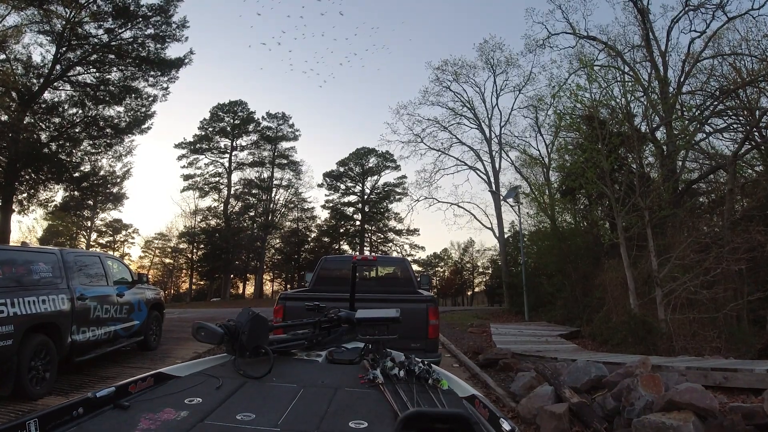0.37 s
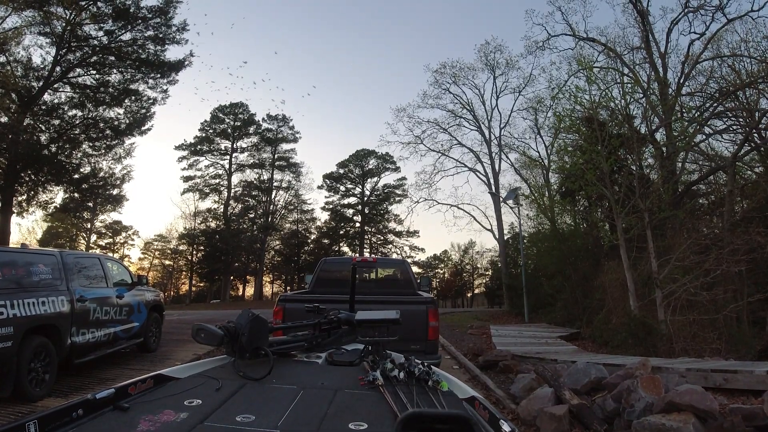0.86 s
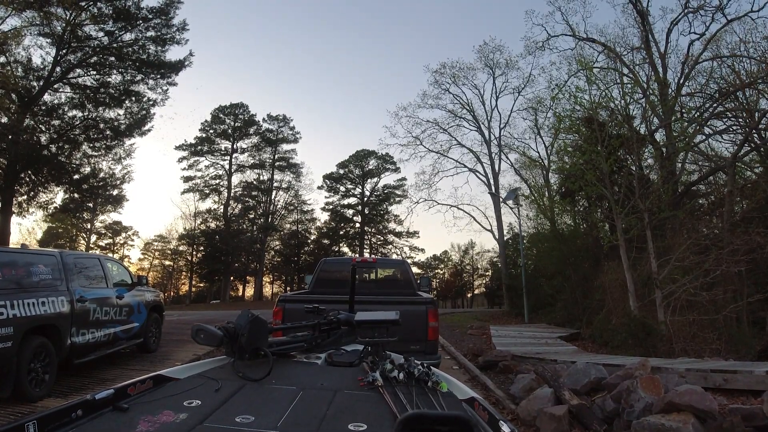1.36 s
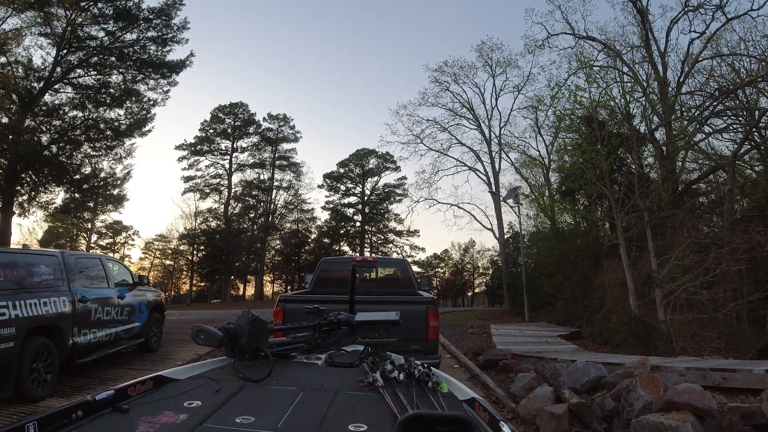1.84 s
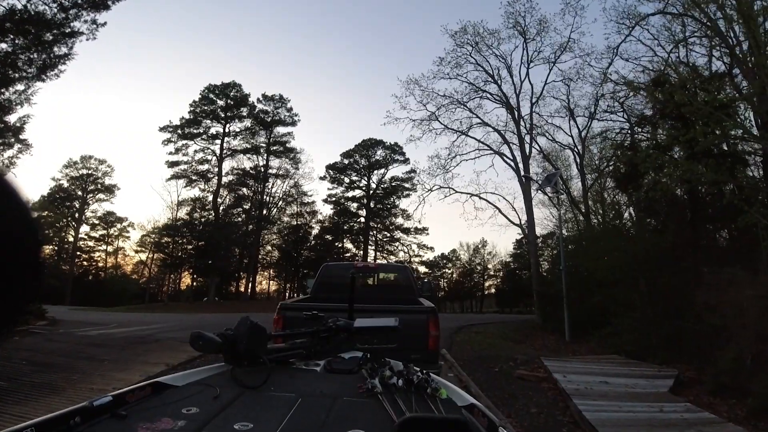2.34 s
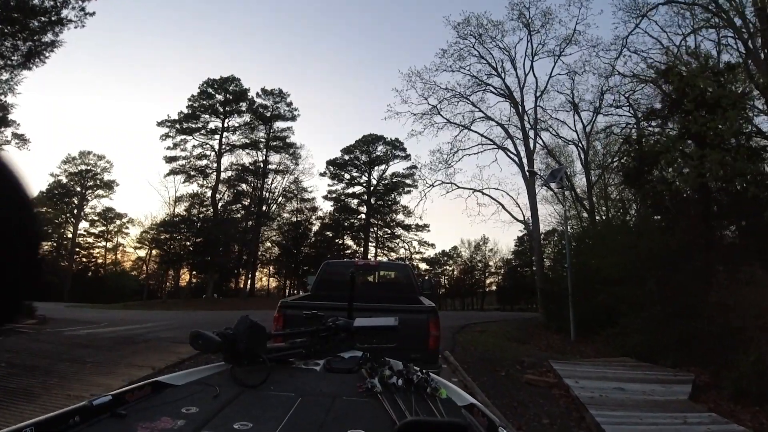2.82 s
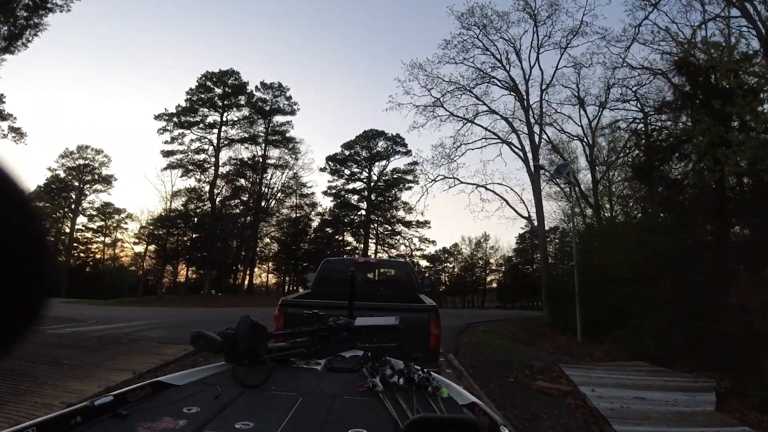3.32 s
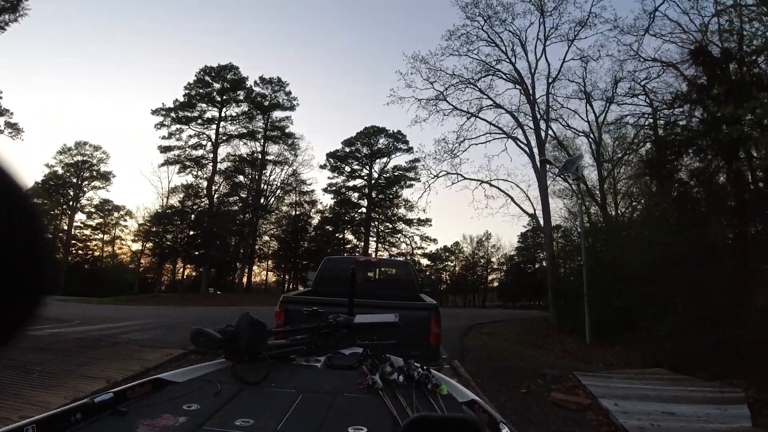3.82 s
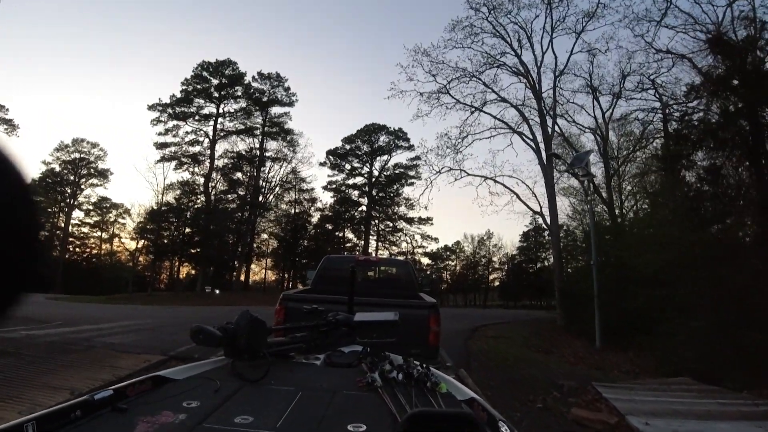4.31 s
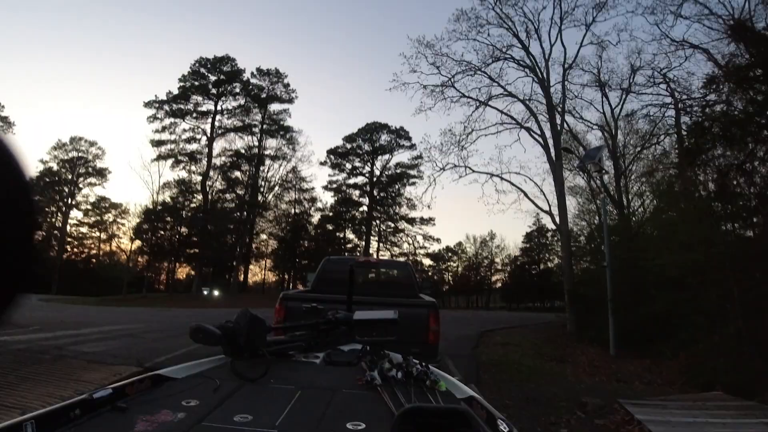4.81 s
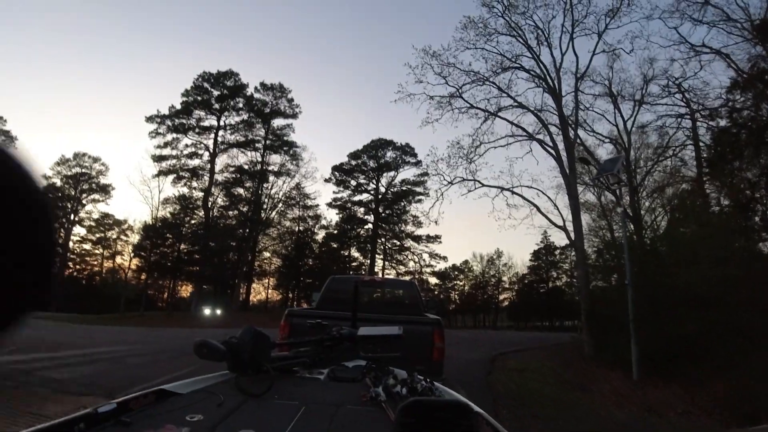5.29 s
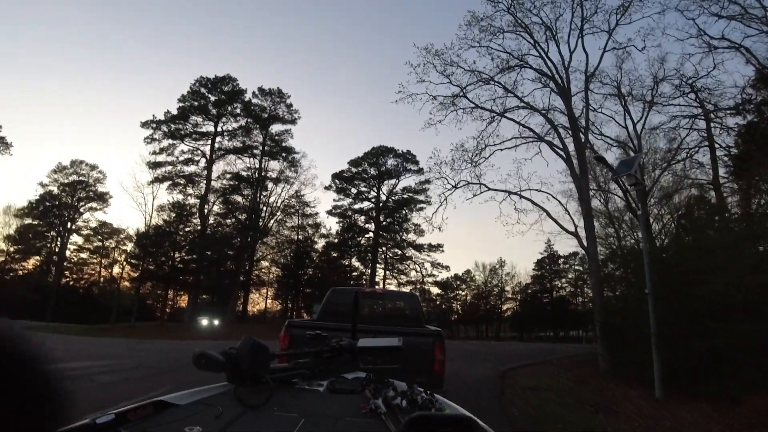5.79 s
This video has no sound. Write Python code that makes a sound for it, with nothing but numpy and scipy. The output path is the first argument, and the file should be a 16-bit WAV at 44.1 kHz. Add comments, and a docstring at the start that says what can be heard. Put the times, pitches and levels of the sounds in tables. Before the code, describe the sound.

A nearby engine revs up with a raspy growl and is let off, then a pickup drones down the road with wind and trailer rattle.

```python
"""On a boat on a trailer, a microphone hears the pickup that tows it.
First a near engine revs and rasps, built from loping tones and puffed noise, and is let off.
After a quiet moment and a hard cut, the pickup drones along: firing tones from unequal cylinders.
Coloured noise makes the road roar, the wind on the microphone and a fading high hiss.
Short rings and cracks make the trailer rattle over a bump; low pulses make the buffets."""
import sys
import numpy as np
from scipy import signal
from scipy.io import wavfile
from scipy.ndimage import uniform_filter1d

SR = 44100
rng = np.random.default_rng(int(sys.argv[2]) if len(sys.argv) > 2 else 0)


def transcribe(u):
    """Save the signal u as a 16-bit wav file named by the first command-line argument.

    u: samples, shape (n,) or (channels, n), limited to [-1, 1]; the rate is SR.
    q: integer samples, one column per channel.
    """
    v = np.clip(np.atleast_2d(u).T, -1, 1)
    q = np.round(v * 32767).astype(np.int16)
    wavfile.write(sys.argv[1], SR, q)


def invert_db(x):
    """Field ratio 10**(x/20) for x, a level in decibels (scalar or array-like)."""
    u = np.asarray(x, float) / 20
    return 10 ** u


N = 260631
TIME = np.arange(N) / SR
BINS = np.fft.rfftfreq(1024, 1 / SR)  # the pitches, in Hz, at which noise is coloured

# Colour of the yard's background noise: [f/Hz, relative level/dB]
YARD_COLOUR = [(15, -45), (25, 5), (140, 0.5), (173, -6.5), (313, -25.5), (399, -11), (945, -27),
               (2300, -30), (5140, -51.5), (8580, -52), (15500, -47.5)]
# Likeness of left and right in the yard and on the road: [f/Hz, likeness from -1 to 1]
YARD_LIKENESS = [(60, 0.93), (240, 1.0), (950, 0.96), (3770, 0.79), (15000, 0.15)]
ROAD_LIKENESS = [(60, 0.07), (240, 0.86), (950, 0.99), (2000, 0.78), (3770, 0.45), (8000, -0.41),
                 (15000, 0.3)]
# Colour of the noise on the road: [f/Hz, relative level/dB]
ROAD_COLOUR = [(140, -26), (230, -6.5), (508, -25), (736, -11), (1410, -28), (2910, -30.5), (4850, -39.5),
               (7940, -42), (8670, -59.5), (9140, -77), (9980, -90), (15500, -60)]
# Resonances of body and bed in the road noise: [f/Hz, width/Hz, boost/dB]
BODY_RESONANCES = [(705, 55, 5.5), (968.5, 52, 12.5), (1139, 99, 8.5), (560, 67, 3), (2210, 300, 3.5),
                   (2901, 61, 4.5), (3400, 85, 1.5), (3840, 72, 4.5)]
# Colour of the lumpy wind on the microphone: [f/Hz, relative level/dB]
WIND_COLOUR = [(10, -27.5), (30, 5.5), (70, 8.5), (160, 1.0), (260, -11.5), (480, -11.5), (700, -60)]
# Narrow bands of high hiss: [f/Hz, width/Hz, wobble level/dB, fading/(dB/s)]
HIGH_HISS = [(8450, 710, -62, 13), (9500, 300, -85, 7.5)]
# One thin high squeak: [start t/s, rise/s, length/s, wobble level/dB, fading/(dB/s), f/Hz]
SQUEAK_SHAPE = 4.36, .025, .35, -70, 75, 10050
# Faint drivetrain whines: [f/Hz, width/Hz, wobble level/dB]
DRIVETRAIN_WHINES = [(722, 14, -57), (955, 14, -61), (1100, 14, -63), (2920, 30, -66)]
# Low buffets: [t/s, level/dB, f/Hz]
BUFFETS = [(2.76, -28.5, 70), (4.189, -21.5, 60), (4.492, -22, 70), (4.844, -17, 82), (5.109, -19.5, 74.5)]
# Knocks of the trailer fittings: [t/s, level/dB, ring f/Hz]
TRAILER_KNOCKS = [(1.495, -37.5, 2310), (1.496, -36.5, 1570), (1.497, -40, 1020), (1.921, -55, 4070),
                  (2.84, -39, 1820), (4.7556, -34, 2200), (4.7805, -34, 1650), (4.804, -28, 1580),
                  (4.8915, -27.5, 2420), (4.892, -36, 4100), (4.9357, -28.5, 1530), (5.0185, -42, 2070),
                  (5.0285, -28, 1900), (5.0644, -32.5, 1910), (5.0886, -38, 1710), (5.1286, -34.5, 4040),
                  (5.1452, -36, 3900), (5.1492, -30.5, 1890), (5.1861, -40, 1850), (5.2238, -33, 1770),
                  (5.4168, -41, 1920), (5.744, -38, 1670)]
# Partials in the ring of one fitting: [ratio to the ring f, level/dB, time to fall 60 dB/s]
FITTING_PARTIALS = [(1, 0, .035), (.68, -8, .025)]
# The pickup on the road: [t/s, firing f/Hz, octave level/dB]
DRONE_COURSE = [(2, 93.14, -23.5), (2.4, 93.27, -24.5), (2.85, 93, -22), (3.3, 93.73, -24),
                (3.9, 92.4, -24), (4.5, 93.03, -25.5), (4.85, 92.64, -32.5), (5.5, 89.9, -32),
                (5.85, 89.9, -33.5)]
# Side tones from eight unequal cylinders: [multiple of the cycle (firing / 8), level over the octave/dB]
CYLINDER_TONES = [(5, -13), (10, -28), (12, -28), (13, -20), (15, -27), (19, -28), (21, -27), (24, -23),
                  (28, -31), (30, -31), (31, -30), (32, -32), (40, -36), (46, -38), (53, -36), (62, -35),
                  (64, -37)]
# A soft falling hum in the quiet moment: [t/s, firing f/Hz, firing level/dB, octave level/dB]
COAST_COURSE = [(1.48, 100.3, -70, -63.5), (1.58, 99.1, -67, -45), (1.72, 90.7, -51, -42),
                (1.82, 85.83, -41, -37.5), (1.96, 86.8, -59, -48)]
# The revving engine: [t/s, cycle f/Hz, firing tone level/dB]
REV_COURSE = [(0, 24.62, -31.5), (.42, 26.21, -26), (.7, 26.49, -24.5), (.92, 27.3, -20),
              (1.15, 27.84, -23.5), (1.24, 26.23, -33), (1.62, 21.88, -52)]
# Its steady tones from each bank: [multiple of the cycle, relative level/dB]
STEADY_TONES = [(9, 0), (12, -6), (18, -13), (24, -15), (26, -20)]
# The loping tones between them: [multiple of the cycle, relative level/dB]
LOPING_TONES = [(3, -10), (4, -9), (7, -1), (8, 0), (10, -1), (13, -9), (14, -8), (17, -14)]
# Colour of the revving engine's roar: [f/Hz, relative level/dB]
ENGINE_ROAR_COLOUR = [(18, -63.5), (30, -17), (76, -14), (165, -11), (246, -13), (288, -8.5), (490, -8),
                      (1730, -29), (3370, -42), (6000, -69), (7800, -110), (13200, -120)]
# Resonances of its tailpipe: [f/Hz, width/Hz, boost/dB]
TAILPIPE_RESONANCES = [(1133.3, 19, 15.5), (1570, 70, 1), (2010, 310, 2), (2620, 170, 6), (3480, 190, 8.5),
                       (3740, 810, 5.5)]

LIFT_S = 1.24  # both throttles are let off
CUT_S = 1.963  # hard cut from the yard to the road


def evened(x):
    """Scales to rms 1."""
    return x / np.sqrt(np.mean(x ** 2) + 1e-20)


def after(s):
    """Seconds gone since s, zero before it."""
    return np.maximum(TIME - s, 0)


def read(points, hz):
    """Reads a spectrum table on a log-frequency axis."""
    f, value = np.transpose(points)
    return np.interp(np.log(hz + 1), np.log(f + 1), value)


def curves(rows):
    """Joins the rows of a table with straight lines, one value per sample for each column."""
    s, *columns = np.transpose(rows)
    return [np.interp(TIME, s, column) for column in columns]


def humps(table):
    """Adds up resonance humps, in dB."""
    return sum(db / (1 + (2 * (BINS - hz) / width) ** 2) for hz, width, db in table)


def wobble(hz, order=3):
    """Random wandering of rms 1: white noise kept below hz."""
    low_pass = signal.butter(order, hz, fs=SR, output="sos")
    return evened(signal.sosfilt(low_pass, rng.standard_normal(N)))


def hiss(colour_db, likeness, patchy_db, band_hz, lag_s=0):
    """Two-channel noise of a colour, patchy in time and pitch, with rms 1 inside band_hz."""
    a, b, c, d, patches, streaks = rng.standard_normal((N // 256 + 5, 513, 6)).T
    # axis 0 is pitch, axis 1 is time
    patches = evened(uniform_filter1d(uniform_filter1d(patches, size=9, axis=0), size=8, axis=1))
    # narrow in pitch and long in time: faint tonal streaks in the noise
    streaks = evened(uniform_filter1d(uniform_filter1d(streaks, size=2, axis=0), size=24, axis=1))
    likeness = np.clip(likeness, -1, 1)[:, None]
    mid = (a + 1j * b) * np.sqrt(1 + likeness)
    side = (c + 1j * d) * np.sqrt(1 - likeness)
    late = np.exp(-2j * np.pi * BINS * lag_s)[:, None]  # delays the left channel
    level_db = colour_db[:, None] + patchy_db * (patches + 1.6 * streaks)
    spectrum = np.array([(mid + side) * late, mid - side]) * invert_db(level_db)
    noise = evened(signal.istft(spectrum, nperseg=1024, noverlap=768)[1][:, :N])
    inside = (BINS > band_hz[0]) & (BINS < band_hz[1])
    power = invert_db(2 * colour_db)
    return noise / np.sqrt(np.sum(power[inside]) / np.sum(power))


def tones(table, turns, waver_db):
    """Multiples of one cycle, their levels wavering with three random curves taken in rotation."""
    wavers = [wobble(19) for _ in range(3)]
    total = 0
    for i, (multiple, db) in enumerate(table):
        gain = invert_db(db + waver_db * wavers[i % 3])
        total = total + gain * np.sqrt(2) * np.cos(2 * np.pi * (multiple * turns + rng.random()))
    return total


def yard_background():
    """Patchy coloured noise lies under the yard."""
    level_db = -40
    return invert_db(level_db) * hiss(read(YARD_COLOUR, BINS), read(YARD_LIKENESS, BINS),
                                patchy_db=1.2, band_hz=(0, 20000))


def wind():
    """Wind on the microphone is low, lumpy noise in random gusts, growing as it goes."""
    start_db, growth_db_per_s = -42.5, 2.3
    gusts_db = 2.0 * wobble(15)
    level_db = start_db + growth_db_per_s * after(CUT_S) + gusts_db
    likeness = 0 * BINS + 0.59
    return invert_db(level_db) * hiss(read(WIND_COLOUR, BINS), likeness, patchy_db=1.5, band_hz=(0, 300))


def road_roar(turns):
    """Exhaust roar, tyre whir and air are three pitch bands of noise, lightly beaten by the firing."""
    roar_db, dip_s, dip_db, dip_width_s = -45, 5.2, 7, 0.31  # the roar dips briefly
    whir_db, whir_drop_db = -49.5, 3.5
    air_db, air_drop_db = -66, 9.5
    dull_s, dull_over_s = 4.8, 0.41  # the treble dulls late on
    lag_s = .00006  # the left channel hears the road a little later
    roar_db = roar_db - dip_db * np.exp(-((TIME - dip_s) / dip_width_s) ** 2)
    dull = np.minimum(after(dull_s) / dull_over_s, 1)
    whir_db = whir_db - whir_drop_db * dull
    air_db = air_db - air_drop_db * dull

    colour_db = read(ROAD_COLOUR, BINS) + humps(BODY_RESONANCES)
    likeness = read(ROAD_LIKENESS, BINS)
    # steep hand-overs between the bands, 36 dB per octave
    low_db = 36 * np.log2((BINS + 1) / 1400)
    high_db = 36 * np.log2((BINS + 1) / 4400)
    roar_colour = colour_db - np.maximum(low_db, 0)
    whir_colour = colour_db + np.minimum(low_db, 0) - np.maximum(high_db, 0)
    air_colour = colour_db + np.minimum(high_db, 0)
    roar = hiss(roar_colour, likeness, patchy_db=1.0, band_hz=(400, 1250), lag_s=lag_s)
    whir = hiss(whir_colour, likeness, patchy_db=1.0, band_hz=(1500, 4000), lag_s=lag_s)
    air = hiss(air_colour, likeness, patchy_db=1.5, band_hz=(4600, 7500), lag_s=lag_s)
    bands = invert_db(roar_db) * roar + invert_db(whir_db) * whir + invert_db(air_db) * air

    beat = evened(1 + 0.092 * np.cos(2 * np.pi * turns) + 0.033 * np.cos(2 * np.pi * turns / 4))
    return invert_db(0.63 * wobble(25)) * beat * bands


def high_hiss():
    """Narrow noise bands, mostly opposite in the two channels, fade away."""
    total = 0
    for hz, width, db, fading in HIGH_HISS:
        opposite, alike = (wobble(width) * np.cos(2 * np.pi * (hz * TIME + rng.random()))
                           for _ in range(2))
        level = invert_db(db - fading * after(2.8))
        total = total + level * (opposite * [[1], [-1]] + 0.75 * alike)
    return total


def squeak():
    """A thin high tone, made fuzzy by random wobble, swells quickly, fades and stops."""
    start_s, rise_s, length_s, db, fading, hz = SQUEAK_SHAPE
    sounding = np.minimum(after(start_s) / rise_s, 1) ** 2 * (TIME < start_s + length_s)
    fuzz = np.array([wobble(200), wobble(200)])
    level = invert_db(db - fading * after(start_s + rise_s))
    return sounding * level * fuzz * np.cos(2 * np.pi * hz * TIME)


def whines():
    """Drivetrain whines are narrow fuzzy tones that come and go."""
    return sum(invert_db(db) * wobble(width) * np.cos(2 * np.pi * hz * TIME)
               for hz, width, db in DRIVETRAIN_WHINES)


def buffets():
    """Each buffet is a brief low pulse, stronger on the left."""
    out = np.zeros((2, N))
    for s, db, hz in BUFFETS:
        cycles = (TIME - s) * hz
        pulse = np.cos(2 * np.pi * cycles) * np.exp(-(cycles / 0.18) ** 2)
        out += invert_db(db) * pulse * [[1.15], [.85]]
    return out


def knock(hz, crack_db, order=3):
    """A dry crack and the short ring of a fitting, reaching the two channels differently."""
    t = np.arange(2205) / SR
    phase = rng.random((2, 1))
    ring = sum(invert_db(db - 60 * t / t60) * np.sin(2 * np.pi * (hz * ratio * t + .5 * phase))
               for ratio, db, t60 in FITTING_PARTIALS)
    band = signal.butter(order, [1100, 4000], "band", fs=SR, output="sos")
    crack = evened(signal.sosfilt(band, rng.standard_normal((2, len(t)))))
    onset = np.minimum(t / .0025, 1)
    return onset * (ring + crack * invert_db(crack_db - 60 * t / .022))


def trailer_rattle():
    """Loud knocks come at set times; small random ticks start at the bump and thin out."""
    bump_s, ticks_per_s, calm_s, softest_tick_db = 4.74, 170, 2.5, -46
    out = np.zeros((2, N + SR))  # room for the last ring
    for s, db, hz in TRAILER_KNOCKS:
        sound = invert_db(db) * knock(hz, crack_db=-7)
        out[:, round(s * SR):][:, :sound.shape[1]] += sound
    out = out[:, :N]

    rate = ticks_per_s * (TIME > bump_s) * np.exp(-after(bump_s) / calm_s)
    tick_db = softest_tick_db + 3 * np.minimum(rng.exponential(1, N), 2.4)
    ticks = (rng.random(N) < rate / SR) * invert_db(tick_db)
    kind = rng.integers(0, 8, N)  # each tick gets one of eight ring pitches
    for k, hz in enumerate(np.geomspace(1450, 2050, num=8)):
        chosen = (ticks * (kind == k))[None]
        out += signal.oaconvolve(chosen, knock(hz, crack_db=-11), axes=1)[:, :N]
    return out


def pickup(hz, firing_db, octave_db):
    """The firing tone and its octave peak together; returns the sound and the firing count."""
    turns = np.cumsum(hz * (1 + .001 * wobble(15))) / SR
    firing = invert_db(firing_db + 0.93 * wobble(6.3)) * np.cos(2 * np.pi * turns)
    octave = invert_db(octave_db + 0.27 * wobble(2.6)) * np.cos(4 * np.pi * turns)
    return np.sqrt(2) * (firing + octave), turns


def pulling_pickup():
    """In the yard the pickup's firing rate climbs to the lift and sags; a soft hum follows."""
    start_hz, climb_hz_per_s, sag_hz_per_s = 85.1, 6.2, 86
    firing_db, firing_fade_db_per_s = -29.5, 123.5
    peak_db, rise_db_per_s, fade_db_per_s = -28.5, 31, 108  # the octave peaks at the lift
    off = after(LIFT_S)
    to_go = np.maximum(LIFT_S - TIME, 0)
    hz = start_hz + climb_hz_per_s * (TIME - off) - sag_hz_per_s * off
    octave_db = peak_db - rise_db_per_s * to_go - fade_db_per_s * off
    pull, _ = pickup(hz, firing_db - firing_fade_db_per_s * off, octave_db)
    coast, _ = pickup(*curves(COAST_COURSE))
    return pull + coast


def revving_engine(order=2):
    """Firing tone, steady tones of each bank, loping tones between, and roar puffed at each firing."""
    bank_db, bank_fade_db_per_s = -31, 81
    roar_db, roar_fade_db_per_s = -35, 43.5
    # smoother as it revs, loping again when let off
    lope_db, lope_sink_db_per_s, lope_back_db, lope_fade_db_per_s = -31.5, 7.5, 12, 75
    rasp_hz, rasp_sink_db_per_s = 2200, 5.5  # the rasp on top of the roar dulls as it goes
    cycle_hz, firing_db = curves(REV_COURSE)
    off = after(LIFT_S)
    bank_db = bank_db - bank_fade_db_per_s * off
    roar_db = roar_db - roar_fade_db_per_s * off
    back = np.clip((TIME - LIFT_S) / 0.035 + 1, 0, 1)
    lope_db = lope_db - lope_sink_db_per_s * (TIME - off) + lope_back_db * back - lope_fade_db_per_s * off

    turns = np.cumsum(cycle_hz * (1 + .002 * wobble(15))) / SR
    firing_wave = np.cos(2 * np.pi * 6 * turns)  # six firings a cycle
    firing = invert_db(firing_db + 1.4 * wobble(20)) * np.sqrt(2) * firing_wave
    steady = invert_db(bank_db) * tones(STEADY_TONES, turns, waver_db=1.3)
    loping = invert_db(lope_db) * tones(LOPING_TONES, turns, waver_db=1.8)

    puffs = evened(1 + 0.072 * firing_wave + 0.045 * np.cos(2 * np.pi * turns))
    colour_db = read(ENGINE_ROAR_COLOUR, BINS) + humps(TAILPIPE_RESONANCES)
    roar = hiss(colour_db, read(YARD_LIKENESS, BINS), patchy_db=1.25, band_hz=(400, 3000))
    high_pass = signal.butter(order, rasp_hz, "high", fs=SR, output="sos")
    rasp = signal.sosfiltfilt(high_pass, roar)
    rasp_gain = invert_db(rasp_sink_db_per_s * (0.52 - TIME))
    roar = roar + (rasp_gain - 1) * rasp
    return firing + steady + loping + invert_db(roar_db + .5 * wobble(30)) * puffs * roar


def droning_pickup():
    """Unequal cylinders add side tones that follow the octave; the 14th grows as the octave weakens."""
    cruise_hz, cruise_db = 93.3, -24
    base_db, db_per_hz = -30.5, 1.5  # the firing tone grows as the revs sink
    settle_db, settle_s = 3, 0.82  # and is a little louder at first
    beat_db, beat_per_db = -41.5, 0.5  # the 14th side tone
    hz, octave_db = curves(DRONE_COURSE)
    settling_db = settle_db * np.exp(-(after(CUT_S) / settle_s) ** 2)
    firing_db = base_db + db_per_hz * (cruise_hz - hz) + settling_db
    beat_db = beat_db + beat_per_db * (cruise_db - octave_db)
    sound, turns = pickup(hz, firing_db, octave_db)
    side = invert_db(octave_db) * tones(CYLINDER_TONES, turns / 8, waver_db=2.0)
    fourteenth = invert_db(beat_db) * tones([(14, 0)], turns / 8, waver_db=3.0)
    return sound + side + fourteenth, turns


def scene():
    """The yard before the cut, the road after it, with knocks and buffets over both."""
    yard = yard_background() + pulling_pickup() + revving_engine()
    drone, turns = droning_pickup()
    road = wind() + road_roar(turns) + high_hiss() + squeak() + whines() + drone
    cut = np.clip((TIME - CUT_S) / .0005, 0, 1)
    return (1 - cut) * yard + cut * road + buffets() + trailer_rattle()


def top_cut(x):
    """Nothing passes above the cut-off."""
    return signal.sosfilt(signal.butter(12, 16320, fs=SR, output="sos"), x)


def record(dry):
    """Fades both ends softly over 3 ms and finishes the mix."""
    ends = np.clip(np.minimum(TIME, TIME[::-1]) / .003, 0, 1)
    return top_cut(dry * ends)


dry = scene()
out = record(dry)
transcribe(out)
```